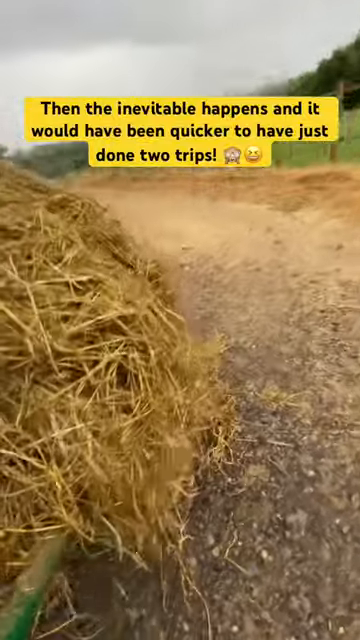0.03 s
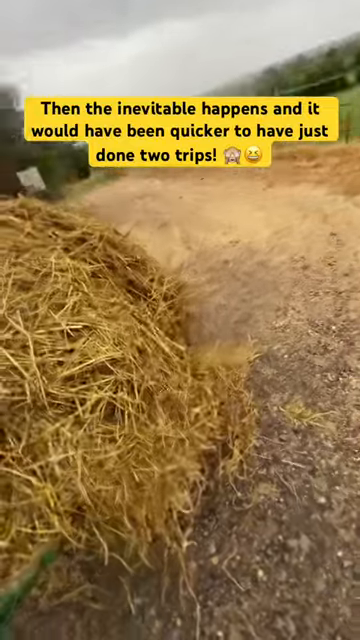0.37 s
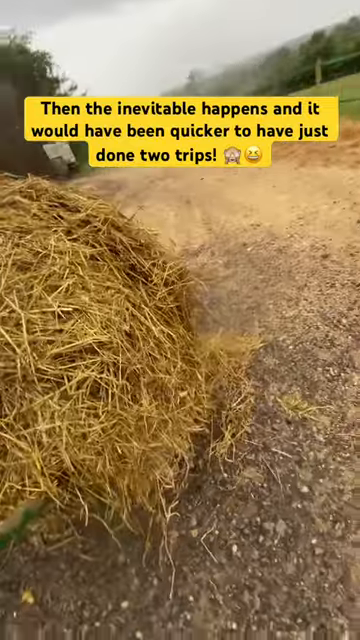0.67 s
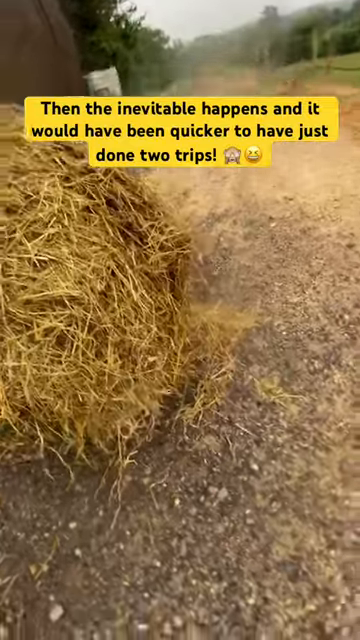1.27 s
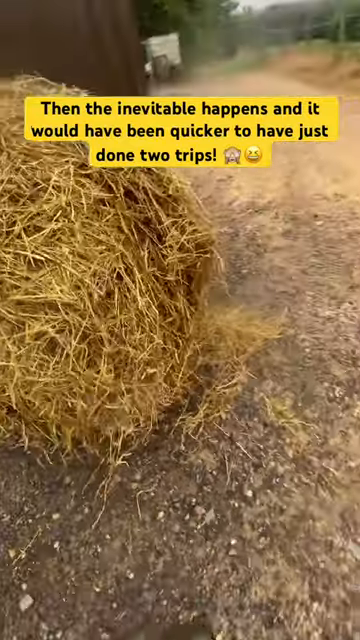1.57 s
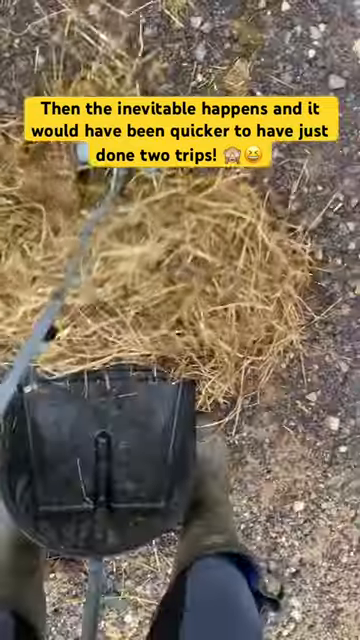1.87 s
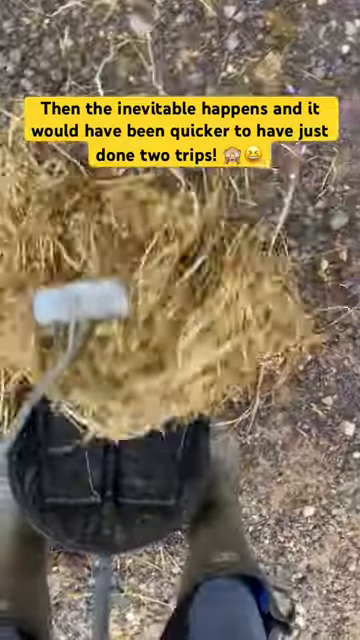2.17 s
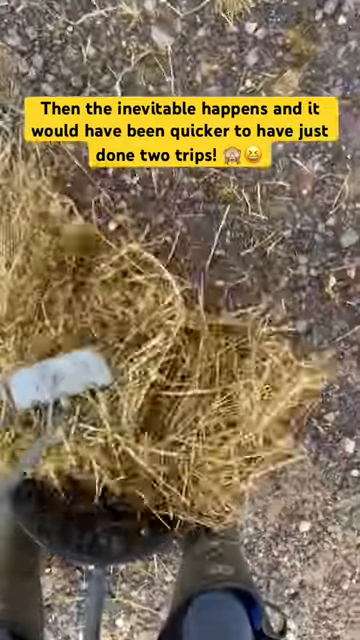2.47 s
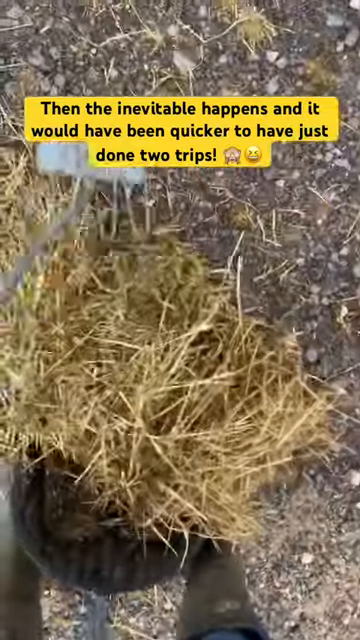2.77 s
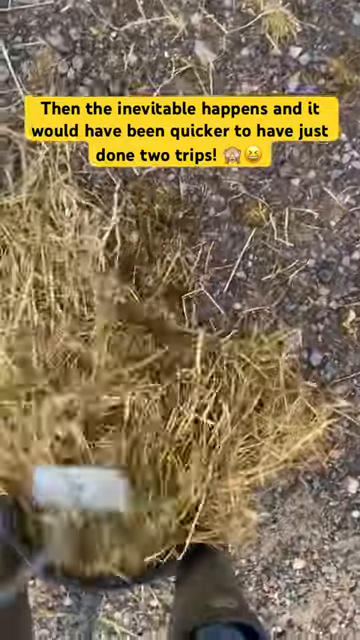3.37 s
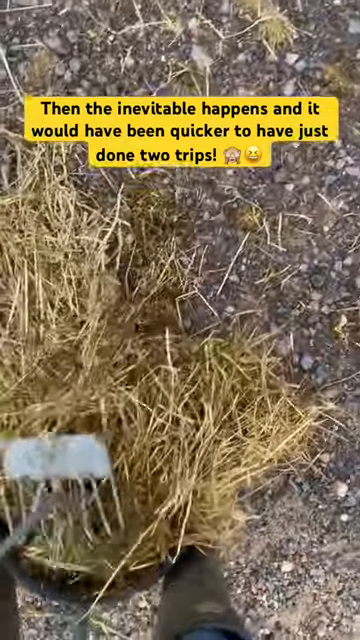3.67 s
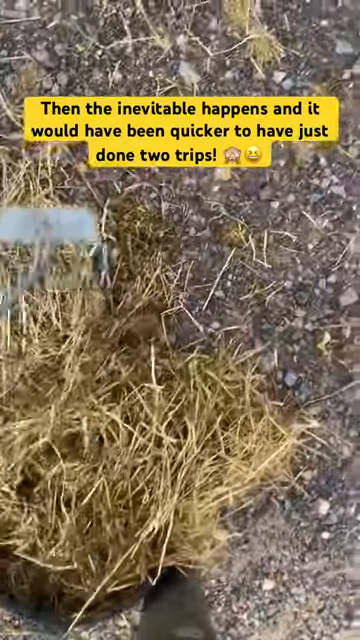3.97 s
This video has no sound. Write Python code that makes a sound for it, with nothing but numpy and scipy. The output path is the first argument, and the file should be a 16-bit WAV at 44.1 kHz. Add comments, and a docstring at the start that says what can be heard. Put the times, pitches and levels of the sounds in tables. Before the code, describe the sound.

Straw is raked over stony ground close by, slightly left, its stalks rustling and snapping throughout over faint open air. For the first 1.6 seconds a wheelbarrow rattles softly and a distant engine hums. Then rake strokes rumble and bump dully until about 4 seconds, with a crunching shove at 2.2. The loudest shove, near 3.4, ends in a hard, briefly ringing knock on a plastic scoop.

```python
"""Straw raked into a plastic scoop on a stony farm track, close by and left of two microphone ports.
Stalks and stones bump dully under the strokes, shoves crunch, and the last ends in a hard knock
that rings the scoop. Before the raking, a barrow's tray rattles and an engine hums in the distance.
The straw rustles and snaps throughout, over a faint bed of open air."""
import sys
import numpy as np
from scipy import signal
from scipy.fft import rfft, irfft, next_fast_len
from scipy.io import wavfile
from scipy.ndimage import uniform_filter1d, map_coordinates

SR = 44100
rng = np.random.default_rng(int(sys.argv[2]) if len(sys.argv) > 2 else 0)


def bounce(signal):
    """Save signal as a 16-bit WAV file at the path given by the first command-line argument."""
    frames = np.transpose(np.atleast_2d(signal))
    limited = np.clip(frames, -1, 1)
    pcm = np.round(limited * 32767).astype(np.int16)
    wavfile.write(sys.argv[1], SR, pcm)


N = 176400

def amp(db):
    """Decibels to gain."""
    return 10 ** (np.asarray(db) / 20)

def unit(x):
    """x scaled to rms 1."""
    return x / np.sqrt(np.mean(x ** 2) + 1e-20)

def along(points, hz):
    """Interpolate (f/Hz, value) points on a log frequency axis."""
    f, v = np.transpose(points)
    return np.interp(np.log(hz + 1), np.log(f + 1), v)

def envelope(points):
    """One gain per sample from (t/s, level/dB) points."""
    return amp(np.interp(np.arange(N) / SR, *np.transpose(points)))

def wobble(rate):
    """A smooth random curve, rate knots a second."""
    return map_coordinates(rng.standard_normal(int(N * rate / SR) + 4), [np.arange(N) * rate / SR])

def filtered(x, response):
    """x through a complex frequency response."""
    m = next_fast_len(N + SR // 4)
    return irfft(rfft(x, m) * response(np.fft.rfftfreq(m, 1 / SR)), m)[..., :N]

def coloured(x, spectrum):
    """x through a (f/Hz, level/dB) spectrum, at rms 1."""
    return unit(filtered(x, lambda hz: amp(along(spectrum, hz))))

def add(track, s, sound):
    """Mix a sound in at time s."""
    part = track[..., int(s * SR):][..., :sound.shape[-1]]
    part += sound[..., :part.shape[-1]]

def grains(rate, spread_db):
    """Two trains of tiny contacts at shared random times with uneven sizes, rms 1."""
    hit = rng.random(N) < rate / SR
    size = amp(spread_db * np.minimum(rng.exponential(size=N), 4))
    return unit(hit * size * rng.standard_normal((2, N)))

def patchy(depth_db):
    """Two noises in which narrow patches flare briefly, as single stalks scrape and ring."""
    spectra = signal.stft(rng.standard_normal((2, N)), nperseg=256)[2]
    flares = uniform_filter1d(rng.standard_normal(spectra.shape[1:]), size=3, axis=0)
    flares = uniform_filter1d(flares, size=6, axis=1)
    return unit(signal.istft(spectra * amp(depth_db * unit(flares)), nperseg=256)[1][:, :N])

# Phase by which the left port leads: f/Hz, phase/rad
PORT_LEAD = [(1500, .1), (3200, 1.6), (5500, .5), (10400, 6.2), (16000, 11.7)]
# Likeness of the two ports: f/Hz, coherence/0-1
PORT_COHERENCE = [(400, 1), (3600, 0.077), (7000, 0.94)]
def ports(pair):
    """Two closely spaced microphone ports hear a partly alike sound, the left one first."""
    def mix(hz):
        turn = np.arccos(np.clip(along(PORT_COHERENCE, hz), 0, 1)) / 2
        return np.array([np.cos(turn), np.sin(turn)])
    common, apart = filtered(pair, mix)
    stereo = np.array([common + apart, common - apart])
    return filtered(stereo, lambda hz: np.exp(.5j * along(PORT_LEAD, hz) * np.array([[1], [-1]])))

# Open air over the track: f/Hz, relative level/dB
AIR_SPECTRUM = [(20, -15.5), (55, 10), (300, -31), (1200, -20), (6000, -42), (16000, -54)]
def air():
    """A faint, mostly deep hush around the microphone."""
    return amp(-55.5) * coloured(rng.standard_normal((2, N)), AIR_SPECTRUM)

# Engine in the distance: t/s, level/dB
ENGINE_LEVEL = [(0, -45), (0.38, -51.5), (0.47, -41.5), (0.82, -37.5), (1.0, -39), (1.25, -36.5),
                (1.45, -41), (1.6, -38)]
# Low rumble of the far engine, and of the near rake in drag(): f/Hz, relative level/dB
RUMBLE_SPECTRUM = [(25, -21), (52, 2.5), (85, 4.5), (150, 0.5), (400, -15.5), (2400, -65)]
def engine(firing_hz=65.3, fade_s=0.14):
    """Far off, a slightly unsteady firing tone over a low roar fades out as the raking starts."""
    t = np.arange(N) / SR
    tone = unit(np.sin(2 * np.pi * firing_hz * t + 0.087 * wobble(rate=11)))
    roar = coloured(rng.standard_normal(N), RUMBLE_SPECTRUM)
    fade = np.clip((ENGINE_LEVEL[-1][0] - t) / fade_s, 0, 1)
    return (tone + amp(-6) * roar) * envelope(ENGINE_LEVEL) * fade

# Rattle of the barrow's tray, the same at both ports: t/s, level/dB
TRAY_LEVEL = [(0, -40.5), (0.05, -52.5), (0.19, -51), (0.28, -42.5), (0.45, -57), (1.6, -56)]
# Ring of the tray: f/Hz, relative level/dB
TRAY_SPECTRUM = [(120, -9), (300, 4), (510, 5), (760, 2.5), (950, -16.5), (4000, -76)]
def barrow():
    """Tiny contacts rattle the loaded tray softly until the raking starts."""
    rolling = np.arange(N) / SR < TRAY_LEVEL[-1][0]
    rattle = coloured(grains(rate=2000, spread_db=3)[0], TRAY_SPECTRUM)
    return rolling * envelope(TRAY_LEVEL) * rattle

# Coarse rustle and fine fizz of the straw near the microphone: t/s, level/dB
RUSTLE_SWELLS = [(0, -50.5), (0.15, -54.5), (0.3, -49), (0.46, -55), (0.85, -60.5), (1.2, -58), (1.3, -49),
                 (1.44, -58), (1.58, -50.5), (1.72, -57.5), (2.28, -50), (2.42, -57), (2.85, -58),
                 (3.28, -52), (3.75, -65), (3.95, -57)]
FIZZ_SWELLS = [(0, -61.5), (0.15, -65.5), (0.27, -48.5), (0.39, -53), (0.48, -63.5), (1.03, -72.5),
               (1.2, -61), (1.5, -64.5), (2.2, -49.5), (2.45, -57), (2.72, -63), (2.87, -63.5), (2.93, -49),
               (3.08, -57), (3.3, -48.5), (3.45, -59), (3.57, -60.5), (3.68, -73), (4, -60.5)]
# Their colours: f/Hz, relative level/dB
RUSTLE_SPECTRUM = [(400, -8), (1000, 2.5), (2600, 3.5), (4000, 0), (5400, 2.5), (7500, -4), (11000, -21)]
FIZZ_SPECTRUM = [(1500, 2), (5000, -18), (8000, 2.5), (15500, 4.5)]
def straw():
    """Stalks slide over each other: a rustle and a fizz, both hiss with crackle on top."""
    rustle = coloured(patchy(depth_db=3) + .45 * grains(rate=300, spread_db=3), RUSTLE_SPECTRUM)
    fizz = coloured(patchy(depth_db=2) + .5 * grains(rate=350, spread_db=3), FIZZ_SPECTRUM)
    return rustle * envelope(RUSTLE_SWELLS) + fizz * envelope(FIZZ_SWELLS)

# Stalks snapping close by: t/s, onset level/dB, low crack over high crack/dB
STALK_SNAPS = [(0.604, -33.5, -7), (0.692, -39, -7), (0.976, -38.5, -12), (1.227, -34, 7),
               (1.421, -40.5, 16), (1.601, -32.5, 17), (1.624, -27, 23), (1.981, -33, -27),
               (2.245, -31.5, 8), (2.491, -26, 7), (2.623, -41, 6), (2.659, -38.5, -2), (2.738, -39.5, -5),
               (2.781, -40.5, 0), (2.877, -38.5, 6), (3.116, -35, 14), (3.336, -40, -9), (3.569, -43, 16),
               (3.747, -41.5, -10), (3.828, -42.5, 1), (3.943, -37, -9)]
def snaps(t60_s=0.017):
    """Dry stalks break: sharp, short cracks, each with its own share of lower ring."""
    out, t = np.zeros((2, N)), np.arange(SR // 25) / SR
    low = coloured(rng.standard_normal((2, N)), [(600, -4.5), (5500, 3.5), (12000, -12.5)])
    high = unit(np.diff(rng.standard_normal((2, N))))
    for k, (s, db, low_db) in enumerate(STALK_SNAPS):
        part, share = slice(k * len(t), (k + 1) * len(t)), amp(low_db)
        crack = (share * low[:, part] + high[:, part]) / np.hypot(1, share)
        add(out, s, amp(db - 60 * t / t60_s) * crack)
    return out

# Bumps and clacks on tray and scoop, the same at both ports: t/s, peak level/dB, f/Hz
SHELL_BUMPS = [(0.006, -30.5, 500), (0.022, -40, 1490), (0.097, -35, 760), (0.372, -28, 520),
               (1.128, -27.5, 600), (1.64, -18, 514), (1.66, -19, 553), (1.695, -21, 460),
               (1.801, -19.5, 620), (1.810, -19, 435), (1.811, -30.5, 1320), (2.038, -25, 400),
               (2.205, -23, 490), (2.640, -26, 338), (2.689, -23, 530), (3.016, -25.5, 416),
               (3.405, -27, 360)]
def bumps(t60_cycles=7.2):
    """Soft contacts on a damped shell ring for a few cycles each."""
    out, t = np.zeros(N), np.arange(SR // 25) / SR
    for s, db, hz in SHELL_BUMPS:
        cycles = hz * t
        swell = (1 - np.exp(-cycles / 0.23)) ** 2 * amp(-60 * cycles / t60_cycles)
        add(out, s, amp(db) * swell / swell.max() * np.sin(2 * np.pi * cycles))
    return out

# Rake strokes on the track, close by: start t/s, end t/s, rumble level/dB, jolt level/dB
RAKE_STROKES = [(1.61, 1.815, -28.5, -37), (1.892, 1.944, -33, -39), (1.976, 2.121, -27.5, -33.5),
                (2.516, 2.626, -34, -35.5), (2.623, 2.773, -28.5, -33), (2.838, 2.858, -26.5, -38.5),
                (2.901, 3.055, -32.5, -37.5), (3.064, 3.063, -21, -39.5), (3.163, 3.435, -34.5, -39),
                (3.515, 3.539, -32, -42.5), (3.608, 3.799, -29, -34.5), (3.935, 3.996, -38.5, -40.5)]
# Dull jolts over the stones: f/Hz, relative level/dB
JOLT_SPECTRUM = [(90, -8), (200, 6.5), (420, 0.5), (660, -10), (1000, -28.5), (2200, -102)]
def drag(from_s=1.6, handling_db=-46, rise_s=0.075, fall_s=0.12, side_db=-15):
    """Each stroke swells into a deep rumble with jolts over the stones, nearly alike at both ports."""
    t = np.arange(N) / SR
    rumble_gain, jolt_gain = amp(handling_db) * (t > from_s), np.zeros(N)
    for start, end, rumble_db, jolt_db in RAKE_STROKES:
        outside = np.maximum((start - t) / rise_s, (t - end) / fall_s)
        swell = amp(-40 * np.maximum(outside, 0))
        rumble_gain = np.maximum(rumble_gain, swell * amp(rumble_db))
        jolt_gain = np.maximum(jolt_gain, swell * amp(jolt_db))
    jolts = coloured(grains(rate=330, spread_db=3), JOLT_SPECTRUM)
    rumble = coloured(rng.standard_normal((2, N)), RUMBLE_SPECTRUM)
    mid, side = rumble_gain * rumble + jolt_gain * jolts
    return np.array([mid + amp(side_db) * side, mid - amp(side_db) * side])

# Shoves near the microphone: peak t/s, level/dB, rise/s, fall/s, treble tilt/dB per octave
RAKE_SHOVES = [(1.129, -39, 0.098, 0.089, 10), (2.248, -27, 0.069, 0.12, 0), (3.338, -24, 0.079, 0.12, 1),
               (3.369, -17, 0.048, 0.099, -2.5)]
# Crunch of straw on gravel, before the tilt: f/Hz, relative level/dB
CRUNCH_SPECTRUM = [(110, -12), (350, 6), (1200, 0), (16000, -28)]
def shoves():
    """The rake pushes a wad over the stones: dense grains swell and die away."""
    out, t = np.zeros((2, N)), np.arange(N) / SR
    for s, db, rise, fall, tilt_db in RAKE_SHOVES:
        def colour(hz):
            return amp(along(CRUNCH_SPECTRUM, hz) + tilt_db * np.log2(hz / 1000 + .5))
        grit = patchy(depth_db=2.5) + grains(rate=900, spread_db=2)
        swell = amp(db - 56.7 * np.maximum((s - t) / rise, (t - s) / fall))
        out += swell * unit(filtered(grit, colour))
    return out

# The rake hits the scoop, close on the left: t/s, strike level/dB, contact time/s
RAKE_HITS = [(3.3627, 1.5, 0.0025), (3.3677, 0, 0.0006)]
# Modes of the plastic scoop: f/Hz, relative level/dB
SCOOP_MODES = [(282, -1), (350, -11), (440, -11), (535, -5), (683, -4), (765, -14.5), (981, -12),
               (1188, -3.5), (1340, -5.5), (1560, -8), (1770, -12), (2580, -14)]
def knock(t60_at_1khz_s=0.029, low_cut_hz=255, lean_db_per_octave=1.55, centred_hz=340):
    """The rake strikes the scoop in two quick contacts; the longer one rings the high modes less."""
    out, t = np.zeros(N), np.arange(SR // 4) / SR
    for s, db, contact_s in RAKE_HITS:
        for k, (hz, mode_db) in enumerate(SCOOP_MODES):
            t60_s = t60_at_1khz_s * (1000 / hz) ** 0.89
            strength = (-1) ** k * amp(db + mode_db) / (1 + (hz * contact_s) ** 2)
            add(out, s, strength * amp(-60 * t / t60_s) * np.sin(2 * np.pi * hz * t))
    def radiation(hz):
        """The small shell radiates little bass, and its higher modes are louder on the left."""
        high_pass = hz ** 2 / (hz ** 2 - 1j * hz * low_cut_hz - low_cut_hz ** 2)
        octaves = np.clip(np.log2((hz + 1) / centred_hz), -1, 2)
        return high_pass * amp(lean_db_per_octave * octaves * np.array([[1], [-1]]))
    return filtered(out, radiation)

def scene():
    """The farm track from the microphone's place: raking close by, the engine far off."""
    return ports(air() + straw() + snaps() + shoves()) + drag() + knock() + bumps() + barrow() + engine()

def record(dry):
    """The recorder rounds off the highest peak and keeps nothing above its band limit."""
    ceiling, top_hz = 0.92, 16050
    rounded = dry / (1 + np.abs(dry / ceiling) ** 6) ** (1 / 6)
    return filtered(rounded, lambda hz: hz < top_hz)

dry = scene()
out = record(dry)
bounce(out)
```